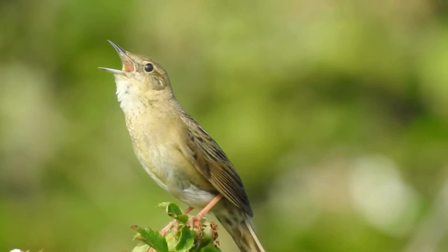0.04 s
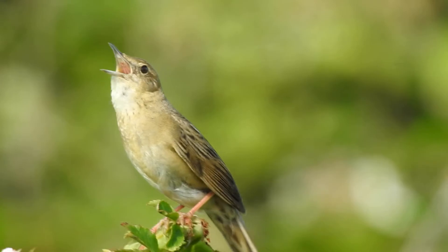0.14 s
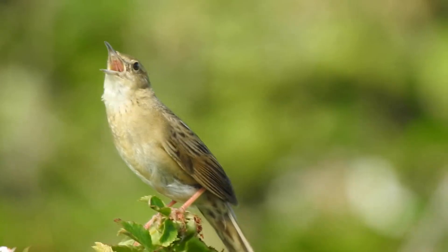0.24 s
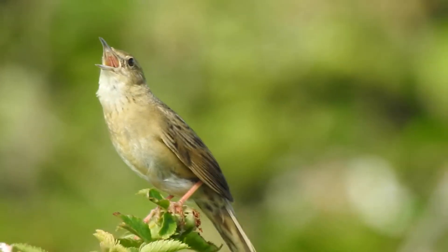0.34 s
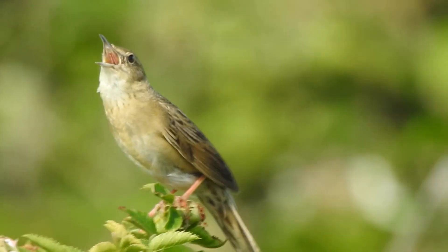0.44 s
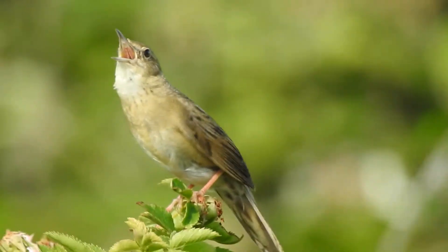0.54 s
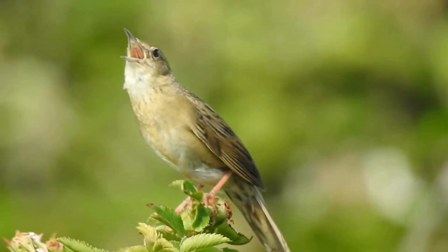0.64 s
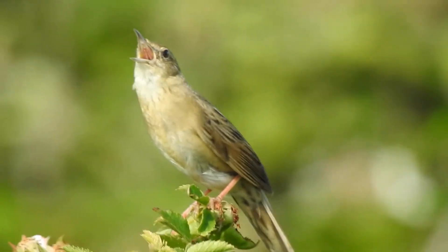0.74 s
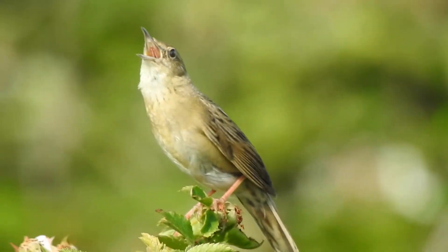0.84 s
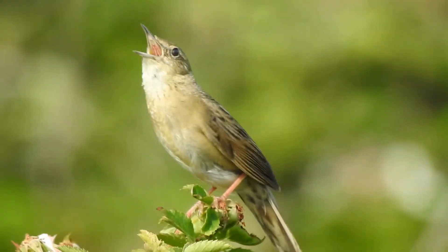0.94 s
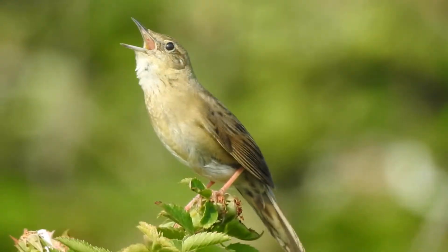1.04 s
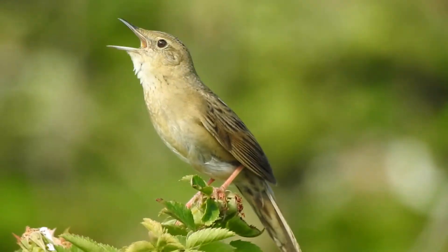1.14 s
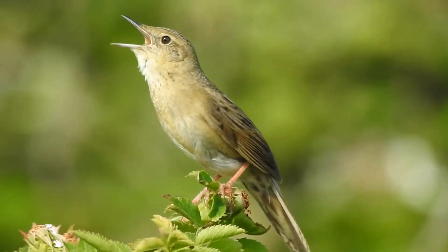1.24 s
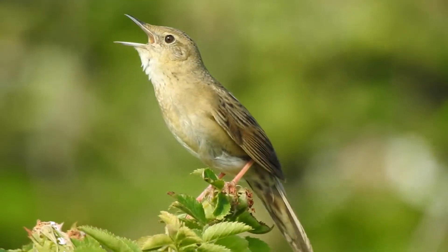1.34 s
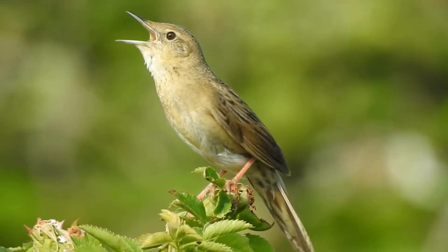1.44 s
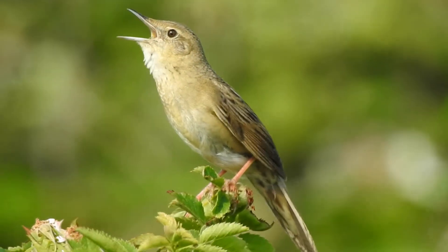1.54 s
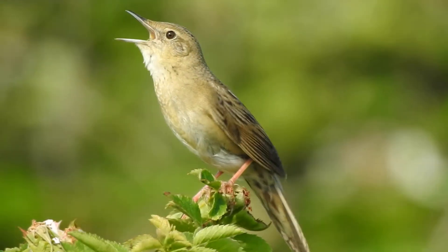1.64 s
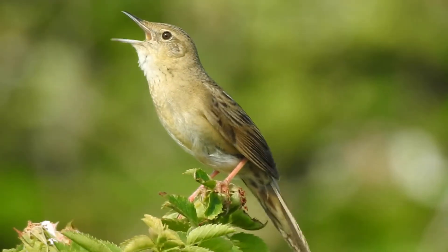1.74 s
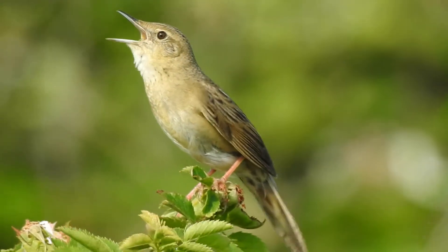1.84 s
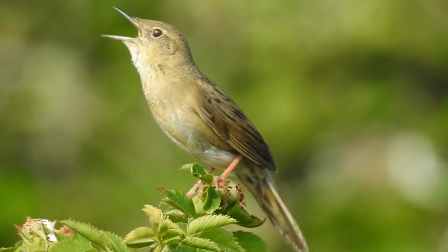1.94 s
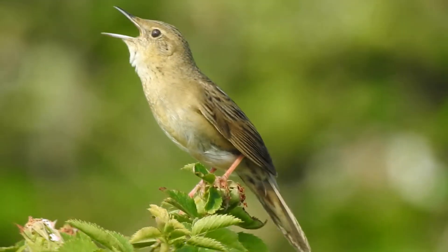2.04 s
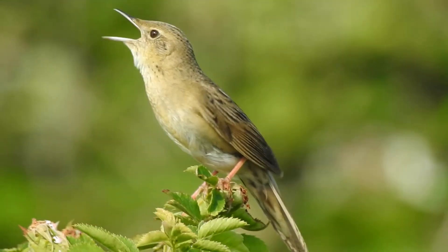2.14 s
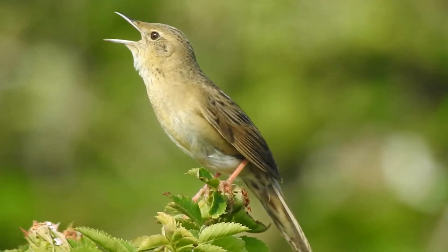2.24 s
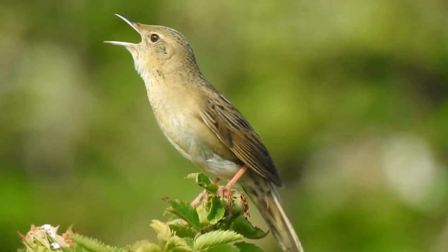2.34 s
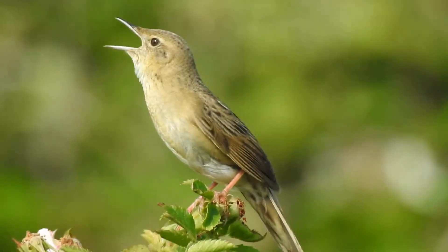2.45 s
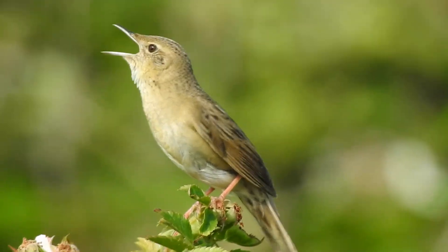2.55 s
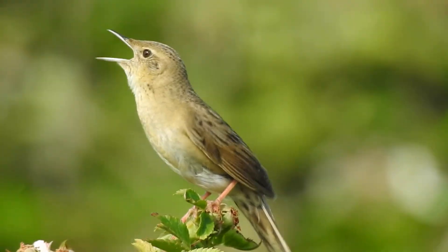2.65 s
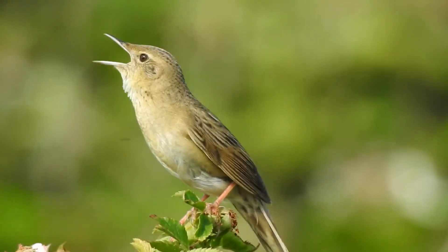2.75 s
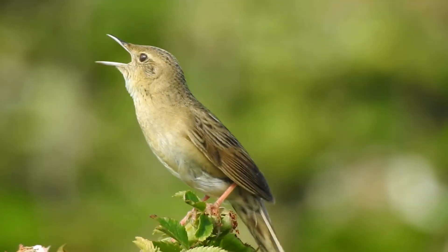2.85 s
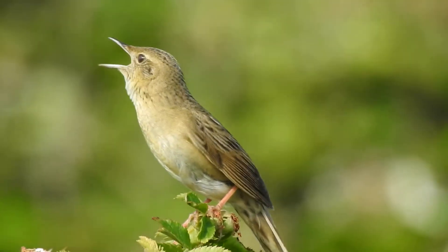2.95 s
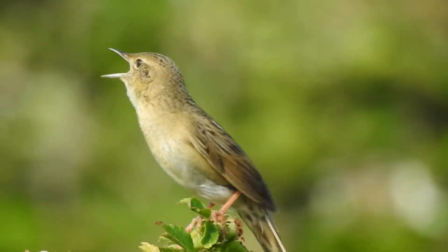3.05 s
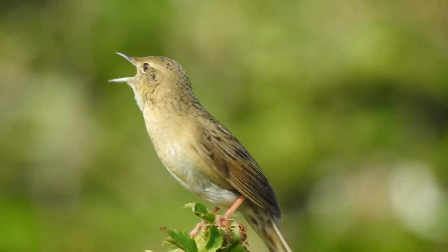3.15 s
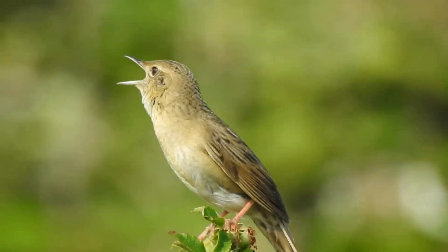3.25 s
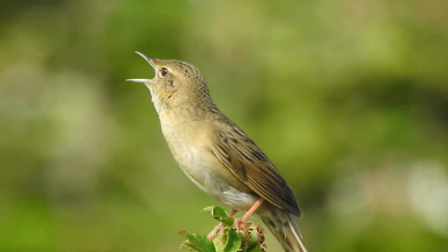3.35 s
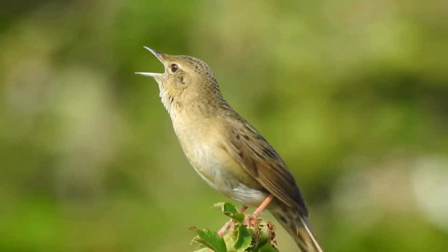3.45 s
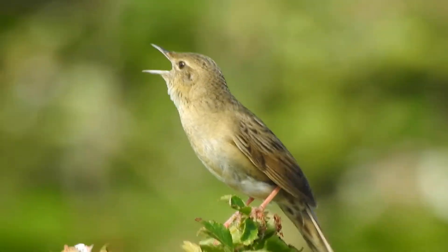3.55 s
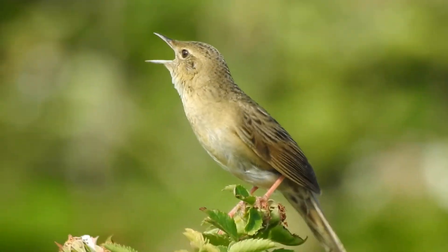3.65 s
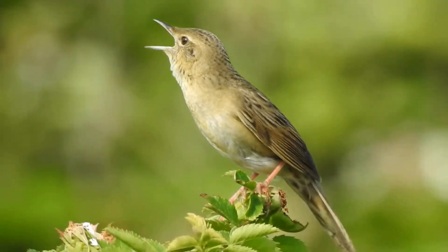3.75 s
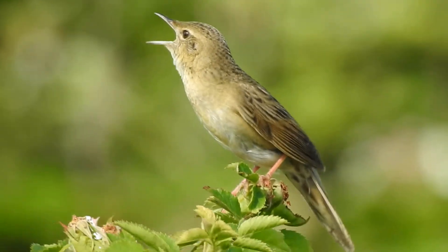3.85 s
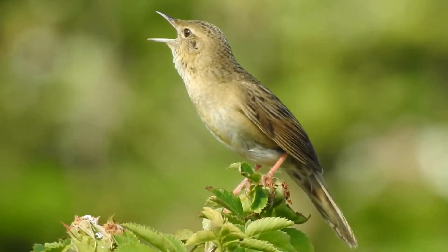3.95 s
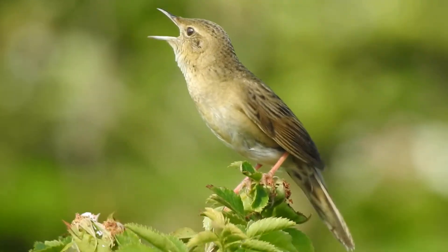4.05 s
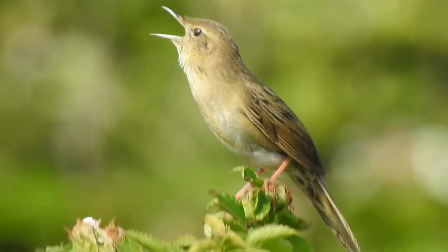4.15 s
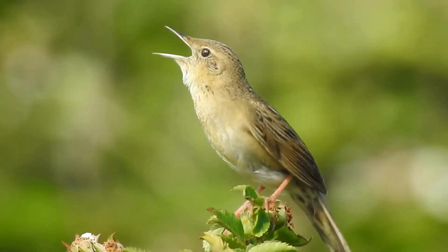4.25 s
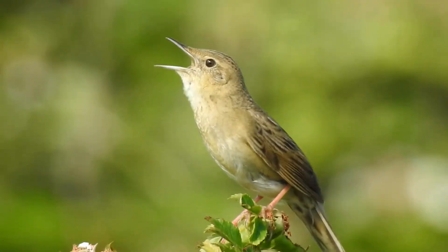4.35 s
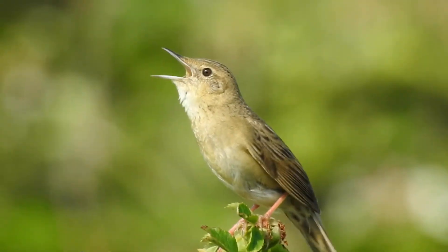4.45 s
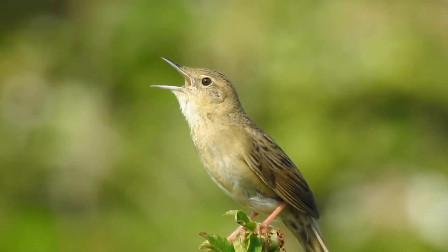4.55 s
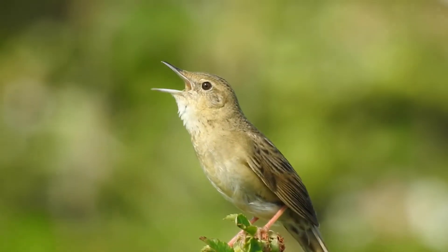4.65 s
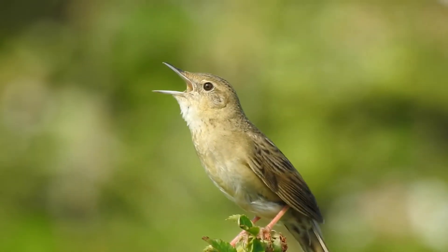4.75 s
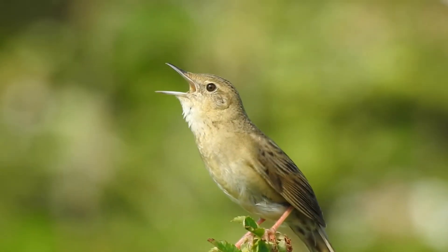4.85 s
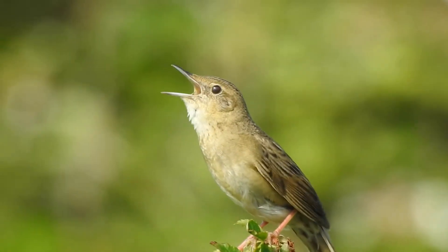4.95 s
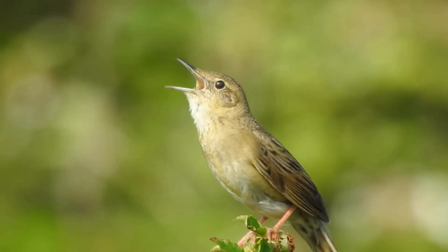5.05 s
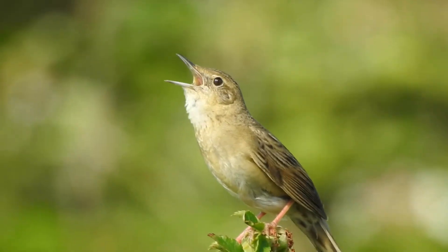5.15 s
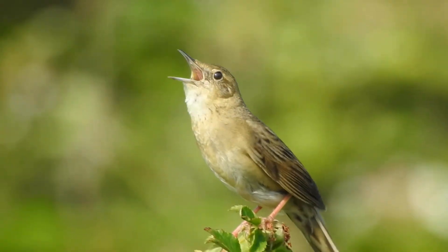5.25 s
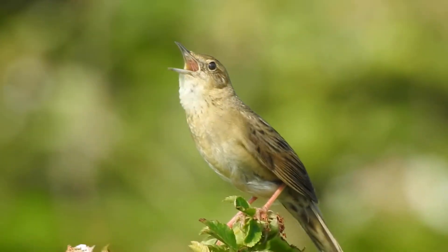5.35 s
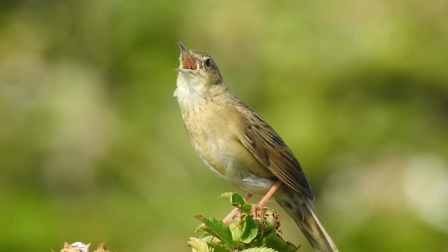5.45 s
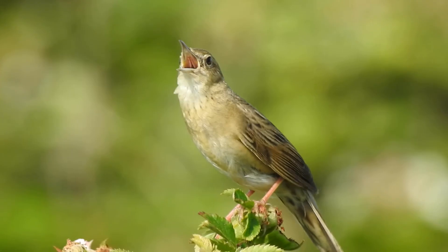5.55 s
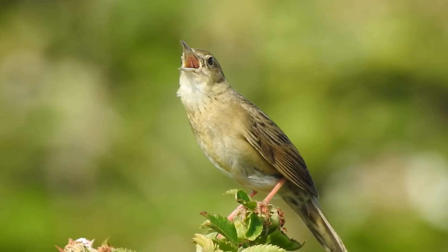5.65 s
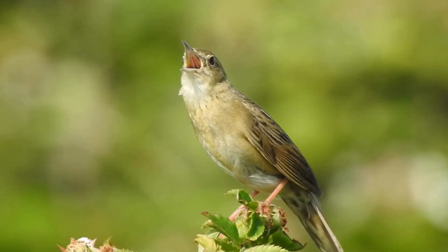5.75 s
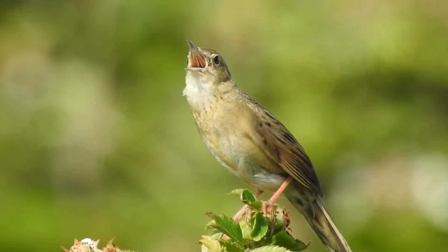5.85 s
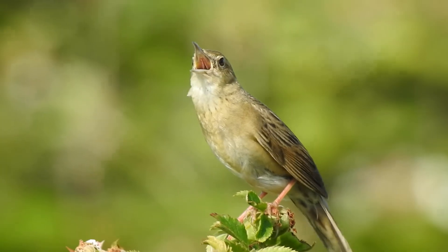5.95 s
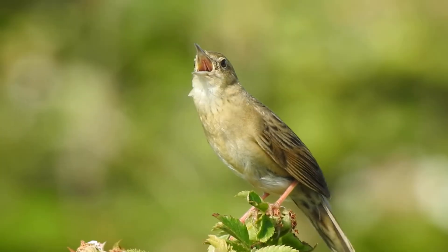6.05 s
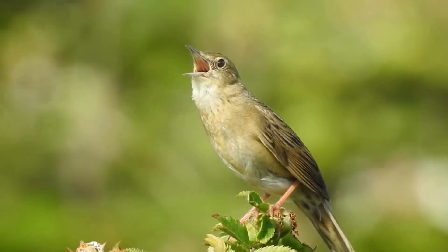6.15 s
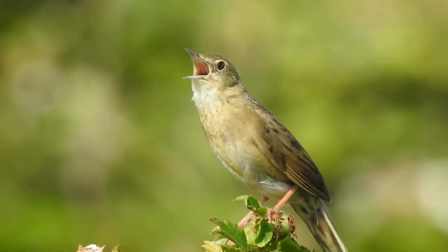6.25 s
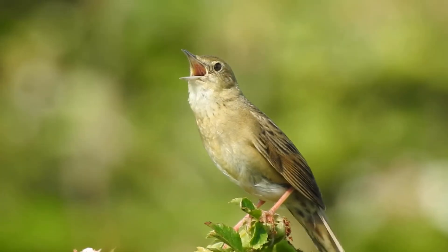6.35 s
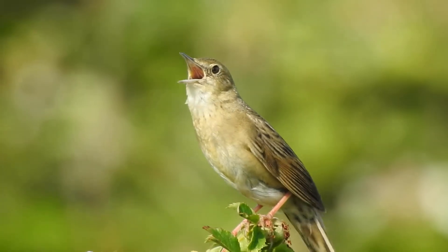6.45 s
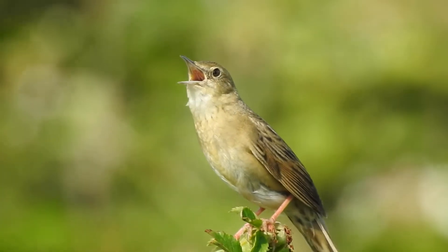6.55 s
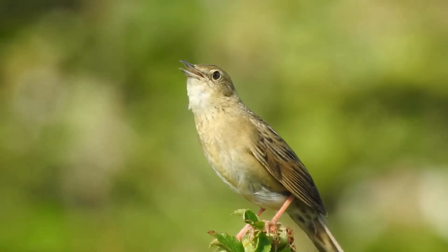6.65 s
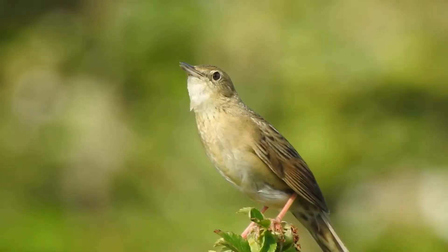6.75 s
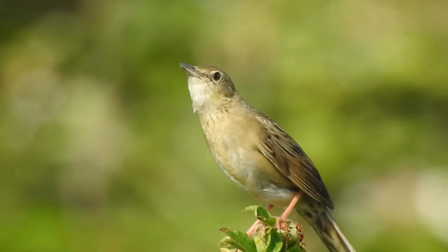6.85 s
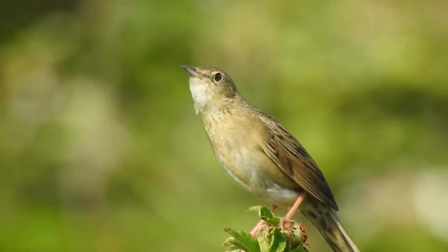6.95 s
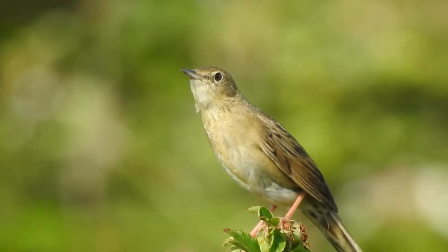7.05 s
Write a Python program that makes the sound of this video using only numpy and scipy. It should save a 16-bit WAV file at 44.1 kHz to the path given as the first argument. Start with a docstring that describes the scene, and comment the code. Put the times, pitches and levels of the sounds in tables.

```python
"""A warbler reels from a bush top: about 24 times a second a faint tick, a rising click and a falling note,
built from gliding sines and noise cracks. Its head turns aside and back, so the direct sound dips while
delayed echoes off the shrubs change. Far songbirds whistle in sine glides, buzz in pulse trains and chatter
in narrow-band noise; dry snaps are noise bursts, the distant rumble is noise in third-octave bands, and
light wind puffs are low noise, independent on the two microphone ports."""
import sys
import numpy as np
from scipy import signal
from scipy.fft import rfft, irfft, next_fast_len
from scipy.io import wavfile
from scipy.ndimage import uniform_filter1d

SR = 44100
rng = np.random.default_rng(int(sys.argv[2]) if len(sys.argv) > 2 else 0)


def master(y):
    """Save y as 16-bit WAV."""
    cut = np.clip(np.atleast_2d(y).T, -1, 1)
    pcm = np.round(cut * 32767)  # scale
    wavfile.write(sys.argv[1], SR, pcm.astype(np.int16))


N = 313551  # samples

# Light wind turbulence, the stronger puffs: t/s, relative level/dB, nominal centre f/Hz
WIND_PUFFS = [(0.017, -46, 149), (.119, -40, 131), (.23, -32.5, 140), (.681, -46, 133), (.829, -36, 197),
              (.9, -42, 170), (1.501, -43, 160), (1.69, -45.5, 131), (1.91, -42.5, 170),
              (2.398, -46.5, 117), (3.38, -42, 160), (3.552, -47, 80), (4.66, -46.5, 161),
              (5.259, -44, 170), (5.771, -44, 90), (6.158, -44, 90), (6.409, -47.5, 90),
              (6.551, -43.5, 150)]
# Spectrum of the distant rumble: f/Hz, relative spectral density level/dB
RUMBLE_SPECTRUM = [(30, -26), (55, -5), (90, -8), (130, -10), (200, -6), (300, -1), (420, -1), (560, -7),
                   (860, -2), (1100, -7), (1350, -20), (1700, -19), (2200, -24), (3200, -26), (5000, -24),
                   (6500, -30), (7800, -41), (9500, -44), (16000, -48)]
# Slow swell of the rumble: t/s, relative level/dB up to 140 Hz, at 140-530 Hz, at 530-1300 Hz
RUMBLE_SWELL = [(0.0, -46, -44, -45), (0.32, -54, -43, -44), (2.21, -58, -44.5, -44),
                (2.37, -48.5, -45, -44.5), (2.63, -66.5, -45, -44.5), (3.02, -48, -43.5, -46),
                (3.76, -50, -51, -47), (5.52, -52, -44, -46.5), (6.23, -50, -51, -47.5),
                (6.56, -44.5, -44.5, -44.5), (6.62, -65, -48, -43.5), (7.1, -47.5, -47.5, -46.5)]
# Dry twig-like snaps: t/s, relative level/dB
TWIG_SNAPS = [(3.7954, -31.5), (4.343, -38)]
# Far chatter bouts: middle t/s, Gaussian half-width/s, centre f/Hz, relative level/dB
CHATTER_BOUTS = [(0, 0.92, 4570, -48), (1.297, 2.7, 3640, -58), (1.683, .07, 3570, -49.5),
                 (2.922, .13, 3660, -48.5), (3.128, 0.18, 4710, -42.5), (3.32, 0.26, 3710, -46)]
# Far whistles: t/s, length/s, start f/Hz, middle f/Hz, end f/Hz, start and end relative level/dB
FAR_WHISTLES = [(0.068, 0.03, 4390, 3750, 3160, -47, -38.5), (0.104, 0.03, 3106, 3090, 3090, -39, -43.5),
                (.1, .29, 3350, 3880, 3390, -50, -45), (0.137, .03, 2950, 2870, 2810, -54, -59),
                (0.179, 0.039, 3350, 3490, 3580, -39, -35), (0.224, .008, 3440, 3510, 3600, -41, -46),
                (.243, .01, 3300, 3370, 3500, -41, -46), (0.26, 0.028, 3200, 3080, 2800, -41.5, -47),
                (0.443, 0.044, 3530, 3620, 3700, -42, -48), (0.916, .29, 3280, 4040, 3510, -50.5, -54),
                (1.67, 0.036, 2530, 2540, 2490, -55, -52), (1.78, 0.25, 3300, 3910, 3310, -44.5, -44.5),
                (2.436, .12, 2220, 2360, 2250, -55.5, -57), (2.58, 0.045, 4180, 4070, 3950, -46, -45),
                (2.604, 0.2, 3290, 3740, 3180, -49, -45), (2.745, 0.031, 4520, 4750, 4880, -38, -38),
                (2.803, .03, 4060, 4480, 4940, -46.5, -38.5), (2.845, .01, 3900, 3700, 3450, -49.5, -52),
                (2.877, 0.027, 4200, 4550, 4900, -40.5, -38), (2.905, .04, 4150, 4030, 3960, -42, -62),
                (3.348, 0.011, 4600, 4510, 4420, -45, -36), (3.378, 0.019, 4040, 3770, 3330, -41, -35),
                (3.455, 0.011, 4650, 4500, 4440, -37, -40), (3.487, 0.02, 4120, 3710, 3200, -39, -41),
                (3.67, .05, 4530, 4450, 4360, -50, -56), (3.69, 0.016, 4030, 3700, 3400, -56, -56),
                (3.728, 0.065, 4650, 4520, 4400, -52, -46), (3.844, .05, 3130, 3290, 3370, -47, -50),
                (3.894, .175, 3394, 3414, 3400, -48, -52.5), (3.89, .03, 3350, 3140, 3020, -54, -58),
                (4.16, 0.076, 3460, 4200, 3700, -53, -59), (4.25, .05, 3370, 3450, 3490, -52, -61),
                (4.32, .06, 3650, 4130, 4100, -55.5, -51), (4.472, 0.066, 3600, 4140, 4230, -55.5, -52),
                (6.54, 0.054, 4120, 3860, 3600, -44.5, -57), (6.78, .075, 3820, 3780, 3930, -49, -51),
                (6.859, 0.09, 3980, 3910, 3470, -47, -43.5), (6.847, 0.035, 4280, 4100, 3930, -52, -50)]
# Far buzzy notes: t/s, length/s, start f/Hz, middle f/Hz, end f/Hz, start and end relative level/dB
FAR_BUZZES = [(0.629, .13, 4720, 4980, 4830, -45.5, -46), (0.779, 0.079, 4100, 3570, 3670, -48, -54),
              (1.438, 0.14, 4640, 4920, 4750, -54, -43), (1.962, 0.075, 4520, 4280, 3870, -47, -44.5),
              (2.271, 0.13, 4590, 4620, 3880, -44, -42.5), (3.568, 0.06, 4030, 4160, 4150, -47, -60),
              (4.617, 0.069, 3480, 3260, 2720, -47, -56), (4.717, 0.24, 2580, 2770, 2880, -59.5, -53),
              (5.08, .07, 3620, 3500, 3010, -55, -53), (5.192, .15, 2660, 3060, 3340, -62, -57),
              (5.395, 0.037, 4700, 4200, 3840, -52.5, -53), (5.446, 0.065, 3760, 3620, 3230, -46, -50.5),
              (5.579, 0.12, 2880, 3280, 3360, -60, -48), (5.791, .03, 4600, 4200, 3750, -51, -47),
              (5.825, .07, 3660, 3560, 3160, -45.5, -51.5), (5.967, 0.12, 2880, 3330, 3500, -60, -55.5),
              (6.33, 0.24, 2300, 2560, 2420, -63, -64.5), (6.716, 0.087, 5500, 4860, 4000, -53, -53),
              (7.016, .015, 3800, 3730, 3650, -56, -63), (7.025, .065, 4310, 4530, 4750, -48.5, -48)]
# Echo paths off nearby shrubs: delay t/ms, level/dB when facing, level/dB when aside,
# left minus right level/dB, right-ear lag t/ms
SHRUB_ECHOES = [(2.3, -20, -24, 2, .03), (3.4, -24, -22, -3, -.04), (4.25, -28, -18, -2, -.03),
                (5.0, -19, -26, 2, .05), (6.1, -20, -28, -3, -.02), (8.0, -27, -20, 3, .04),
                (9.4, -25, -16, -2, -.05), (12.5, -26, -22, 2, .03), (14.5, -23, -22, -3, -.04)]
# The three parts of a syllable, each: t/ms from the click peak, nominal f/Hz, level/dB re the part's peak
TICK_GLIDE = [(-5.7, 6200, -40), (-5.1, 6050, -5), (-4.7, 5950, 0), (-4.2, 5900, -6), (-3.4, 5800, -40)]
CLICK_GLIDE = [(-1.7, 4500, -50), (-1.2, 4900, -26), (-.8, 5400, -11), (-.4, 5900, -3.5), (0, 6280, 0),
               (.4, 6650, -4), (.8, 6900, -12), (1.3, 6900, -20), (2.1, 6900, -45)]
NOTE_GLIDE = [(10.2, 6200, -50), (10.65, 6000, -18), (11.05, 5870, -4), (11.7, 5790, 0), (12.6, 5640, -2.5),
              (14, 5530, -4), (15.3, 5260, -11), (16.6, 5220, -11), (17.5, 5120, -17), (18.2, 5050, -30),
              (19, 5000, -50)]
# Drift of the reel and its head turn: t/s, lag behind the steady beat/ms, nominal click level/dB
REEL_DRIFT = [(0, 0, -3), (.45, .2, -1.8), (.65, .4, -3), (.93, -.6, -2.2), (1.25, .1, -3.7),
              (2.05, -.1, -4.6), (2.17, .6, -5), (2.34, -.4, -5.6), (2.52, .2, -4.7), (3.02, -.7, -5.6),
              (3.37, -3, -8.2), (3.72, -.5, -9.3), (4.01, -2.4, -8), (4.43, -2.7, -6.4), (4.66, -4.7, -5.6),
              (4.95, -5.2, -4.4), (5.27, -4.9, -2.6), (5.42, -5, -3.3), (5.67, -1.3, -2.9),
              (5.8, -1.2, -2.4), (6.54, -.9, -4.1), (6.6, 0, -4.8)]

BREEZE_DB = -56.5  # mean of the two ports
REGION_DB = (2, 1.55, 0.34, -6.5)  # rumble trims: deep, chest, middle, hiss
HISS_SWELL = 0.94  # the hiss follows the middle region, less strongly
DEEP_SIDE = 0.41  # extra difference between the ears in the deepest rumble
CHATTER_WIDTH = .085  # fraction of the centre frequency on either side
BOW = 2.6  # departure of pitch from the straight glide: 2 is a round arch, more is flat-topped
FAST_PER_S, SLOW_PER_S = 63, 58  # buzz pulse rates: falling low notes are fast, rising and high ones slower
FIELD_T60_S, FIELD_DB, FIELD_LIKENESS = 0.34, -21, 0.79  # decay, level of song's tail, ear correlation
FIRST_S, BEAT_S, SYLLABLES = -.0074, .041468, 160
JITTER_MS, JITTER_DB = .15, .5
FACING_DB, ASIDE_DB = -2.5, -8.5  # nominal click level, beak towards the listener and turned aside
# (facing, aside): the note beams less than the click; overtones and cracks have a beam of their own
NOTE_DB, TREBLE_DB = (-2, -6.5), (-5, -10)
CLICK_TRIM_DB, TICK_DB, OVERTONE_DB = 1.2, -16.5, -45  # tick is relative to the click
TICK_CRACK_DB, CLICK_CRACK_DB, NOTE_CRACK_DB = -37.5, -18, -23  # before the beam and filters
NOTE_SCATTER_DB = -3.5  # leaves return the lower note less than the click
THROAT_TOP_HZ, CRACK_TOP_HZ, TOP_HZ = 8600, 9900, 15900  # low-pass edges: fundamentals, cracks, whole scene


def undb(db):
    """Level definition: amplitude ratio of a level in decibels."""
    return 10 ** (np.asarray(db) / 20)


def level(x, db):
    """Root-mean-square normalisation to a given level."""
    return x * undb(db) / np.sqrt(np.mean(x ** 2))


def band(x, lo_hz, hi_hz, order=2):
    """Butterworth band-pass filtering."""
    return signal.sosfilt(signal.butter(order, [lo_hz, min(hi_hz, .45 * SR)], "band", fs=SR, output="sos"), x)


def walk(rate):
    """Low-pass random modulation: levels held 1 / rate s, averaged twice; spread near 1."""
    k = int(SR / rate)
    held = np.repeat(rng.standard_normal(N // k + 1), k)
    return 1.3 * uniform_filter1d(uniform_filter1d(held, k), k)[:N]


def curve(rows, column=1):
    """Linear interpolation of one table column over time."""
    rows = np.array(rows, float)
    return np.interp(np.arange(N) / SR, rows[:, 0], rows[:, column])


def add(out, x, s):
    """Superposition: mix x into out from time s on."""
    i = int(round(s * SR))
    a, b = max(i, 0), min(i + x.shape[-1], N)
    out[..., a:b] += x[..., a - i:b - i]


def shift(x, ms):
    """Propagation delay as linear phase, so any fraction of a sample is allowed."""
    size = next_fast_len(N + SR // 10)
    hz = np.arange(size // 2 + 1) * SR / size
    return irfft(rfft(x, size) * np.exp(-2j * np.pi * hz * ms / 1000), size)[:N]


def field(x):
    """Diffuse scattering in open scrub: exponentially decaying noise response, partly correlated at the ears."""
    t = np.arange(int(FIELD_T60_S * SR)) / SR
    decay = undb(-60 * t / FIELD_T60_S) * np.minimum(t / 0.0012, 1)
    mid, side = rng.standard_normal((2, len(t))) * decay
    opposite = side * np.array([[1], [-1]])
    ears = np.sqrt(1 + FIELD_LIKENESS) * mid + np.sqrt(1 - FIELD_LIKENESS) * opposite
    ears /= np.sqrt(2 * np.sum(mid ** 2))
    return signal.fftconvolve(x[None], ears, axes=1)[:, :N]


def wind():
    """Turbulent pressure on the ports: low puffs over a breeze, uncorrelated and stronger on the right."""
    out = level(band(rng.standard_normal((2, N)), 45, 250) * undb(2.3 * walk(31)), BREEZE_DB)
    t = np.arange(-.1, .1, 1 / SR)
    for s, db, hz in WIND_PUFFS:
        noise = band(rng.standard_normal((2, SR // 2)), 0.75 * hz, 1.46 * hz)
        gust = level(noise[:, -len(t):], db + 4.0)  # the tail is free of the filter's onset
        add(out, gust * np.exp(-(t / 0.033) ** 2), s + t[0])
    return out * undb([[-1.5], [1.5]])


def rumble():
    """Band-limited noise: third-octaves flicker alone and swell by region; ears differ more at high f."""
    out, (f, colour) = np.zeros((4, 2, N)), np.transpose(RUMBLE_SPECTRUM)
    for hz in 32 * 2 ** np.arange(0, 9, 1 / 3):
        mid, side = band(rng.standard_normal((2, N)), hz / 2 ** (1 / 6), hz * 2 ** (1 / 6))
        lumpy = 1 + 2.7 * (hz < 500)  # the bass comes in lumps
        db = np.interp(np.log(hz), np.log(f), colour) + lumpy * (.5 * walk(2.034) + 1.0 * walk(8))
        region = np.searchsorted([140, 530, 1300], hz)
        difference = np.clip(0.04 + hz / 9000 + DEEP_SIDE * (region == 0), 0, 1)
        out[region] += undb(db) * (mid + difference * side * np.array([[1], [-1]]))
    swells = [curve(RUMBLE_SWELL, column=k) for k in range(1, 4)]
    middle_mean = swells[-1].mean()
    swells.append(middle_mean + HISS_SWELL * (swells[-1] - middle_mean))
    return sum(level(part, db) * undb(swell) for part, db, swell in zip(out, REGION_DB, swells))


def snaps():
    """Impulsive fracture: exponentially decaying noise bursts, like small dry twigs."""
    out, t = np.zeros(N), np.arange(400) / SR
    for s, db in TWIG_SNAPS:
        add(out, 2.55 * undb(db) * rng.standard_normal(len(t)) * np.exp(-t / 0.0041), s)
    return band(out, 1800, 7500, order=4)


def chatter():
    """Amplitude-modulated narrow-band noise under a Gaussian envelope for each bout."""
    out, t = np.zeros(N), np.arange(N) / SR
    for s, half, hz, db in CHATTER_BOUTS:
        noise = band(rng.standard_normal(N), hz * (1 - CHATTER_WIDTH), hz * (1 + CHATTER_WIDTH))
        flickering = level(noise * undb(4.3 * walk(70)), 0)
        out += flickering * undb(db) * np.exp(-((t - s) / half) ** 2)
    return out


def far_birds():
    """Frequency modulation: whistles glide, buzzes are gliding pulses; chatter and scattering join them."""
    out, waver = np.zeros((2, N)), walk(60)
    calls = [(c, False) for c in FAR_WHISTLES] + [(c, True) for c in FAR_BUZZES]
    for (s, length, *hz, db_0, db_1), buzzy in calls:
        t = np.arange(s - .008, s + length + 0.0066, 1 / SR)
        u = np.clip((t - s) / length, 0, 1)  # progress through the call
        arch = (hz[1] - (hz[0] + hz[2]) / 2) * (1 - np.abs(2 * u - 1) ** BOW)
        pitch = hz[0] + u * (hz[2] - hz[0]) + arch
        fade = np.clip(np.minimum(t - t[0], t[-1] - t) / 0.0077, 0, 1)
        size = np.sqrt(2) * undb(db_0 + u * (db_1 - db_0)) * fade
        if buzzy:
            high = np.mean(hz) > 4100
            pulses_per_s = FAST_PER_S if hz[-1] < hz[0] and not high else SLOW_PER_S
            cycle = (t - t[0]) * pulses_per_s % 1
            pitch = pitch * (1 + (-.16 if high else .12) * (cycle - .5))  # high pulses glide down, low ones up
            size = size * 2.7 * np.sin(np.pi * cycle) ** (2 if high else 4)
        pan_db = 1.2 * rng.standard_normal()
        add(out, size * np.sin(2 * np.pi * np.cumsum(pitch) / SR) * undb([[pan_db], [-pan_db]]), t[0])
    out *= undb(1.8 * waver)  # moving air makes far calls flutter
    blurred = chatter()
    return out + blurred + undb(-6.5) * field(out.mean(0) + blurred)


def turned(click_db):
    """Source directivity inverted: head turn 0-1, read from how far the click has sunk."""
    return np.clip((FACING_DB - click_db) / (FACING_DB - ASIDE_DB), 0, 1)


def syllables():
    """Quasi-periodic rhythm: time and click level of each syllable from beat, slow drift and chance."""
    beat, (t, late_ms, db) = FIRST_S + BEAT_S * np.arange(SYLLABLES), np.transpose(REEL_DRIFT)
    chance = rng.standard_normal((2, SYLLABLES))
    times = beat + (np.interp(beat, t, late_ms) + JITTER_MS * chance[0]) / 1000
    return zip(times, np.interp(beat, t, db) + JITTER_DB * chance[1])


def chirp(ms, part, detune, turn):
    """Phase as the integral of frequency: a gliding sine for one part, and its second harmonic."""
    t, hz, db = np.transpose(part)
    pitch = uniform_filter1d(np.interp(ms, t, hz), size=15)
    phase = 2 * np.pi * (turn + np.cumsum(pitch) * detune / SR)
    size = undb(uniform_filter1d(np.interp(ms, t, db), size=15)) * (ms > t[0]) * (ms < t[-1])
    return size * np.sin(phase), size ** 2 * np.sin(2 * phase)


def reel():
    """Directional radiation: direct song follows the head; the shrubs get even tones, but the same cracks."""
    direct, treble, crack_train, even = np.zeros((4, N))
    ms = np.arange(-8, 22, 1000 / SR)
    chance = rng.standard_normal((SYLLABLES, 11))
    for (s, click_db), c in zip(syllables(), chance):
        start_s = s + ms[0] / 1000
        aside, late = turned(click_db), 0.2 * c[5]
        tick, _ = chirp(ms, TICK_GLIDE, 1 + 0.014 * c[1], c[2])
        click, click_2 = chirp(ms, CLICK_GLIDE, 1 + 0.0067 * c[3], c[4])
        note, note_2 = chirp(ms - late, NOTE_GLIDE, 1 + .004 * c[6], c[7])
        click = click + undb(TICK_DB + 2.3 * c[0]) * tick
        click_size = undb(click_db + CLICK_TRIM_DB)
        note_size = undb(np.interp(aside, (0, 1), NOTE_DB) + 0.74 * c[8])
        # the syrinx snaps open at each part with a short broad crack
        crack = undb(CLICK_CRACK_DB + c[9]) * click_size * np.exp(-((ms + .3) / 1.1) ** 2)
        crack += undb(NOTE_CRACK_DB + c[10]) * note_size * np.exp(-((ms - late - 12) / 1.6) ** 2)
        crack += undb(TICK_CRACK_DB) * click_size * np.exp(-((ms + 4.7) / .6) ** 2)
        beam = undb(np.interp(aside, (0, 1), TREBLE_DB))
        overtones = click_size * click_2 + note_size * note_2
        add(direct, click_size * click + note_size * note, start_s)
        add(treble, beam * undb(OVERTONE_DB) * overtones, start_s)
        add(crack_train, beam * crack * rng.standard_normal(len(ms)), start_s)
        add(even, click + undb(NOTE_SCATTER_DB) * note, start_s)
    throat = signal.butter(6, THROAT_TOP_HZ, fs=SR, output="sos")  # the windpipe damps fundamentals above
    direct, even = signal.sosfiltfilt(throat, [direct, even])
    crack_train = signal.sosfilt(signal.butter(1, CRACK_TOP_HZ, fs=SR, output="sos"), crack_train)
    cracks = band(crack_train, 6000, 8000, order=1)
    return direct + cracks + treble, even + cracks


def warbler():
    """Multipath propagation: direct song, shrub echoes that follow the head turn, and a scattered tail."""
    direct, even = reel()
    aside = turned(curve(REEL_DRIFT, column=2))
    out = np.array([undb(-.4) * shift(direct, .004), undb(.4) * direct])  # a little to the right
    for ms, facing_db, aside_db, pan_db, lag_ms in SHRUB_ECHOES:
        stir_db = 1.5 * walk(5)  # leaves stir
        echo = even * undb(facing_db + aside * (aside_db - facing_db) + stir_db)
        out += [undb(pan_db / 2) * shift(echo, ms), undb(-pan_db / 2) * shift(echo, ms + lag_ms)]
    return out + undb(FIELD_DB) * field(even)


def scene():
    """Linear superposition of all sources at the two ears."""
    return wind() + rumble() + snaps() + far_birds() + warbler()


def record(dry):
    """Saturation at full scale, then an elliptic low-pass that cuts the top."""
    low_pass = signal.ellip(8, .2, 40, TOP_HZ, fs=SR, output="sos")
    return signal.sosfilt(low_pass, np.clip(dry, -1, 1))


dry = scene()
out = record(dry)
master(out)
```